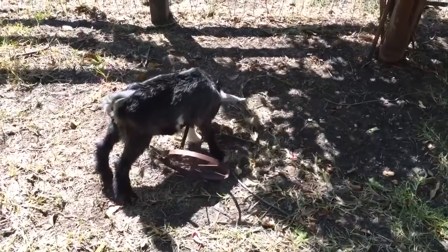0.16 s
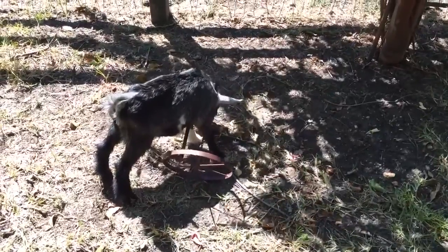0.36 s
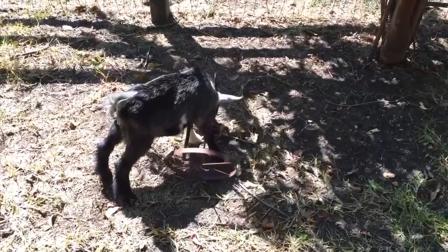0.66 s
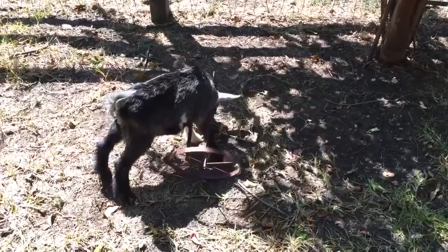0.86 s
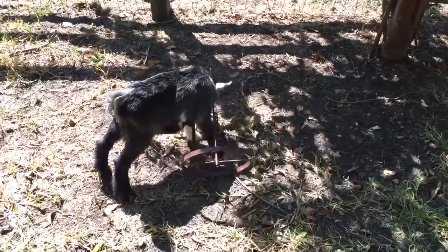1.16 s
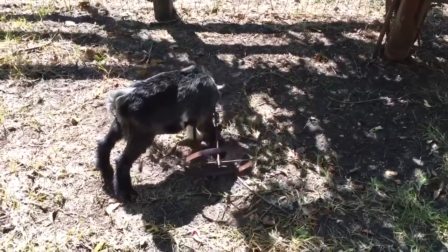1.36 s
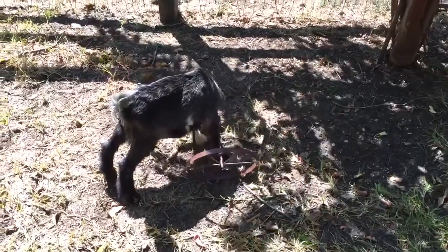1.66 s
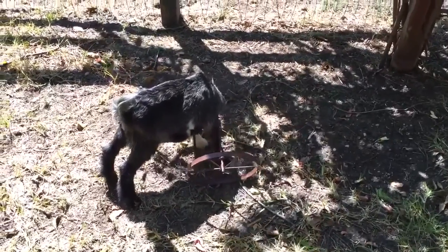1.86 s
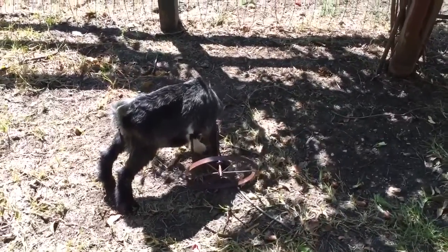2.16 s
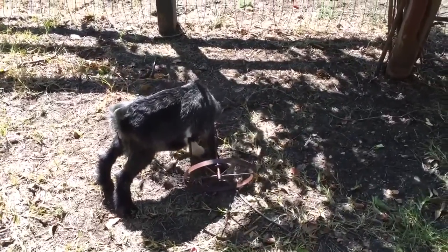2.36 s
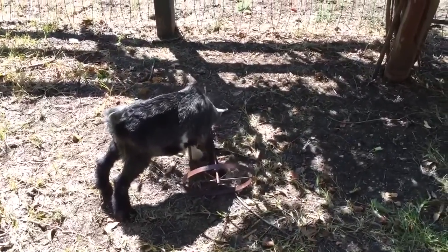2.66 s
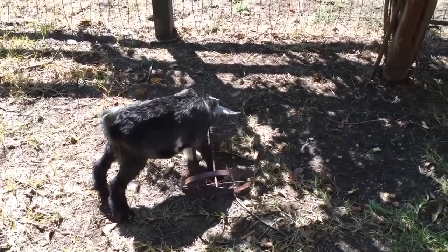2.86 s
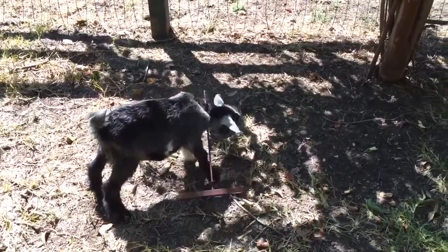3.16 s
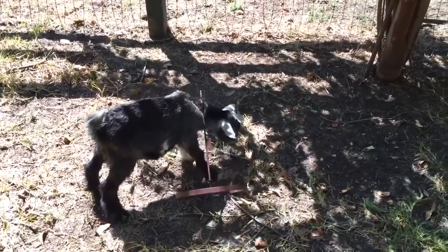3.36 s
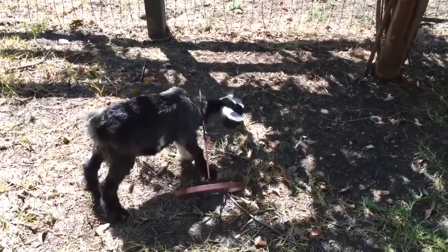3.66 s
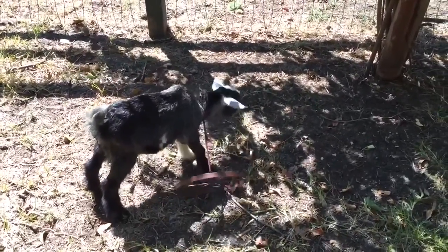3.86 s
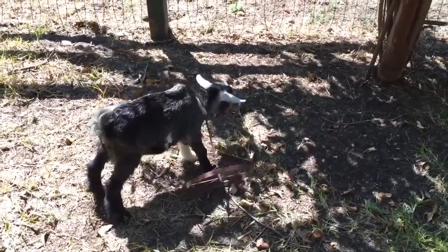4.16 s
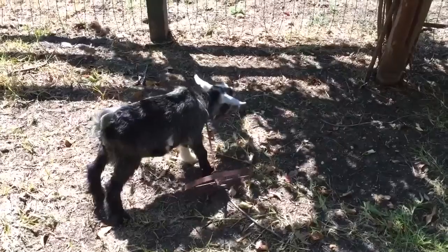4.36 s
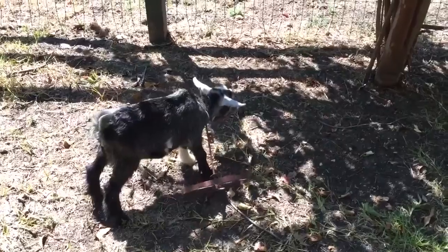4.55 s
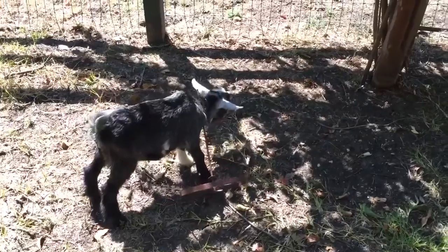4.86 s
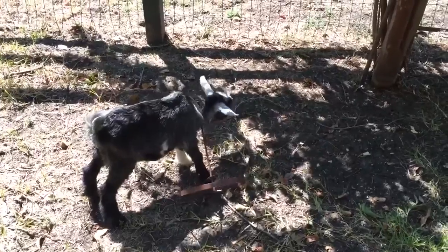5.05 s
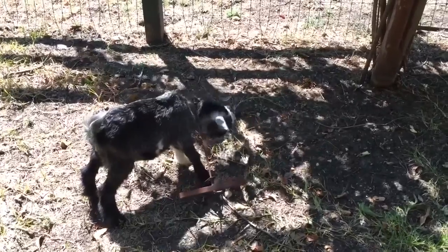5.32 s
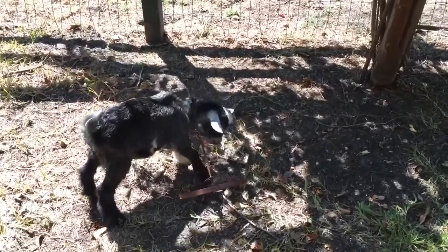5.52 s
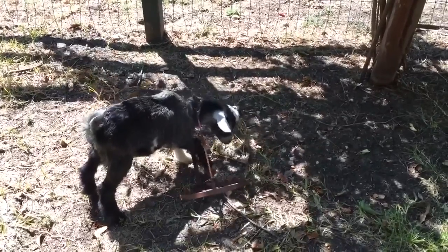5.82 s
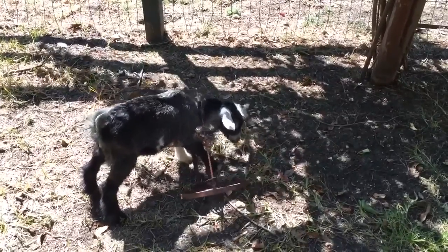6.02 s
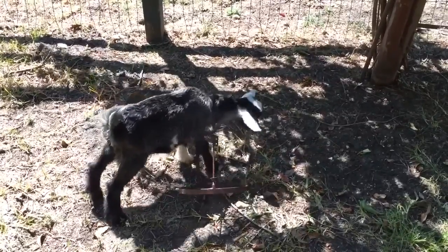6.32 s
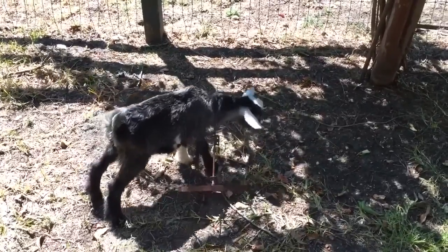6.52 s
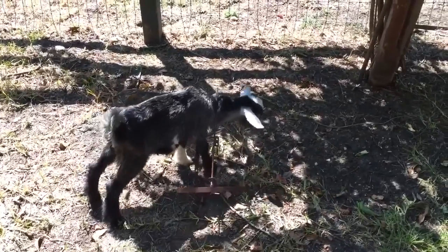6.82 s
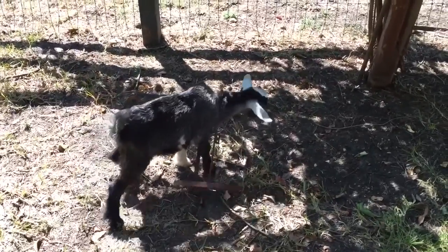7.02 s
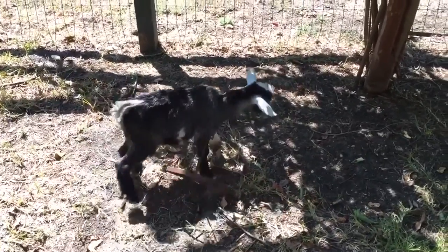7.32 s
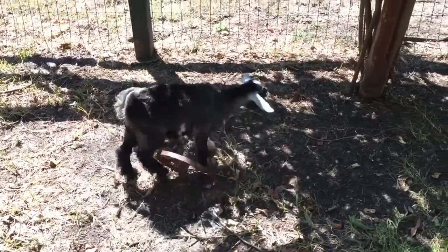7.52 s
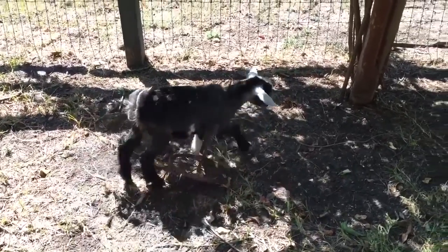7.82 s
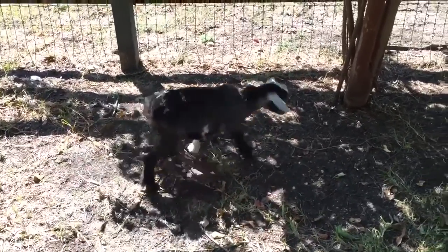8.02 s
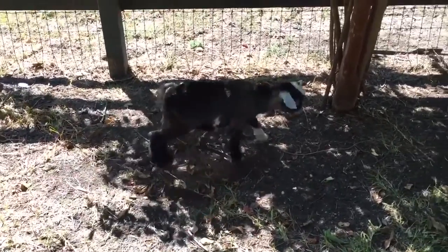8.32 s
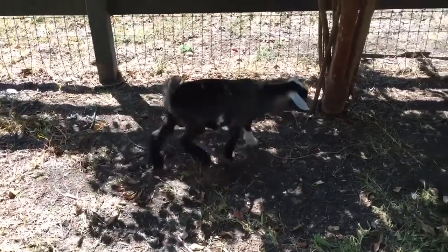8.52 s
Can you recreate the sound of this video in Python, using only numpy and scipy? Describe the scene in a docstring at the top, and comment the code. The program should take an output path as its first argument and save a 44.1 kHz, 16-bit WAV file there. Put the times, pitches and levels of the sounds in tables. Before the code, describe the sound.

Quiet yard with low engine rumble, sharp twig clicks, one hard hollow knock, faint bird warbling, then thin metallic scraping and chinking on dry ground.

```python
"""Puffs of wind buffet the microphone over a distant traffic rumble; soon a fowl calls far off and a small bird warbles.
Nearby, a young goat in a fenced yard shuffles with a small iron wheel caught on its leg.
The wheel scrapes dry ground and rings thinly, hooves and twigs tick, and there is one hard knock.
Shaped noise makes wind, traffic and grit; gliding tones make the animals; short pushes ring the iron and the knocks."""
import sys
import numpy as np
from scipy import signal
from scipy.fft import rfft, irfft
from scipy.io import wavfile
from scipy.ndimage import uniform_filter1d

SR = 44100
rng = np.random.default_rng(int(sys.argv[2]) if len(sys.argv) > 2 else 0)


def ratio(d):
    """dB to gain"""
    e = np.asarray(d, float) / 20
    return 10 ** e


def output_pcm(signal):
    """Save a mono or channel-first signal as 16-bit PCM at the path in sys.argv[1].

    Samples are clipped to [-1, 1] before scaling.
    """
    pcm = np.clip(np.atleast_2d(signal).T, -1, 1) * 32767
    wavfile.write(sys.argv[1], SR, np.round(pcm).astype(np.int16))


N = 382788
TIME = np.arange(N) / SR

# Wheel dragged on the ground: start_s, rise_s, hold_s, level_db, crunch_db (against the hiss), ringing_share (0-1)
WHEEL_DRAGS = [(1.109, 0.022, 0.029, -62.5, -4, 0.3), (1.226, 0.012, 0.041, -65, -4, 0.52),
               (3.912, .01, 0.083, -66, -2, 0.67), (3.996, 0.0065, 0.058, -58, -6, 1),
               (4.136, 0.0025, 0.012, -55, -30, 1), (4.151, 0.009, 0.044, -68, -20, 0.7),
               (6.3, 0.068, 0.0116, -76, -23, 0.3), (6.504, 0.011, 0.084, -73, -23, 0.28),
               (7.002, 0.14, 0.0167, -63.5, -30, 0.87), (7.203, 0.0041, 0.14, -58.5, -13.5, 1),
               (7.358, 0.006, 0.064, -59.5, -9.5, 0.6), (7.664, 0.0057, 0.0032, -49, -6.5, 0.29),
               (7.708, 0.0052, 0.0029, -58.5, -15, 0.93), (7.783, 0.014, 0.0108, -53.5, -3, 0.5),
               (7.812, 0.008, 0.047, -51, -6.5, 0.75), (7.873, 0.042, 0.03, -48, -2.5, 0.28),
               (7.945, 0.011, 0.066, -58, -11, 0.9), (8.054, 0.0077, 0.062, -66.5, -24, 0.45),
               (8.122, 0.021, 0.024, -60.5, 0, 0.2), (8.154, 0.0306, 0.026, -56.5, -2, 0.5),
               (8.22, 0.02, 0.07, -71, -10, 0.3), (8.31, 0.018, 0.059, -49, -7.5, 0.73),
               (8.39, 0.003, 0.046, -52.5, -10, 1)]
# Ringing modes of the iron wheel, lowest rim mode first: pitch_hz, width_hz, level_db (relative)
WHEEL_MODES = [(3800, 29, 5), (4820, 46, 6), (6340, 13, 2), (7365, 26, 3), (7050, 25, -15.5), (8900, 40, 6),
               (9100, 85, -6), (9510, 38, 12), (9700, 63, 6), (10930, 26.4, 8), (11400, 21, -3),
               (11400, 65, -2), (11900, 26, 13), (13100, 50, 11), (14100, 50, -16), (14300, 67, 3.5),
               (15100, 60, -3)]
# Stones chinking on the iron: start_s, level_db, centre_hz (of the modes struck)
STONE_CHINKS = [(4.1395, -48.5, 13000), (6.3669, -65, 8970), (6.515, -65.5, 11300), (7.195, -53, 9700),
                (7.358, -51.5, 13100), (7.358, -55, 11400), (7.8005, -51, 7050), (7.8199, -47.5, 6463),
                (8.0765, -47, 11840), (8.33, -58, 9510), (8.331, -46, 3800), (8.33, -55, 10930),
                (8.3935, -49, 11900), (8.425, -48, 13100)]
# Twigs and grit snapping: start_s, level_db, pitch_hz, tap_db (against the click)
TWIG_SNAPS = [(0.961, -42.5, 10100, -20), (1.043, -50, 9000, -25), (1.0597, -33, 11300, -8),
              (1.118, -38, 11100, -25), (1.1296, -35, 5600, 8), (1.1445, -29, 8660, -35),
              (1.2, -31.5, 11500, -35), (1.2353, -24, 11200, -31), (1.251, -31.5, 7170, -0.5),
              (1.3117, -40, 6180, -25), (1.402, -47, 2010, -30), (1.8066, -38, 11800, -13),
              (3.0798, -23.5, 9050, -14), (3.1552, -39, 11200, -23), (3.2082, -27.5, 11700, -37),
              (3.4631, -17.5, 7740, -29), (3.478, -17, 8400, -13), (3.6025, -31.5, 9600, -6),
              (3.669, -29, 2490, -36), (3.6693, -22.5, 8800, -6), (3.808, -43, 5540, -28),
              (3.9114, -46, 7910, -30), (3.951, -38, 12030, -22.5), (4.0054, -30.5, 6900, -35),
              (4.0258, -31.5, 8300, -27), (4.0502, -29.5, 9310, 5.5), (4.126, -34, 11100, -30),
              (4.14, -25, 10500, -23), (5.4778, -51, 5920, -27), (6.0026, -53, 5400, -20),
              (7.276, -35, 9430, -14), (7.5558, -44, 14470, -30), (7.6739, -17, 11300, -29),
              (7.6786, -20, 8250, -36), (7.713, -24, 12500, -12), (7.801, -43, 5000, -13.5),
              (7.938, -31, 9000, -6.5), (7.942, -30.5, 8000, -9), (8.1432, -35, 7960, -18),
              (8.208, -38, 6000, -25), (8.318, -37, 11000, -20)]
# Hard hollow knocks: start_s, level_db
HARD_KNOCKS = [(3.463, -18), (3.669, -41)]
# Resonances of the small hollow: pitch_hz, width_hz, level_db (relative)
HOLLOW_MODES = [(800, 1500, -22), (1345, 330, 3), (1550, 590, 1.5), (2226, 190, -13.5)]
# Small bird, one row a note or part of a note:
# start_s, length_s, pitch_hz (at the start), glide_hz, level_db, trill_swing_hz
BIRD_SONG = [(2.075, 0.1, 3574, -250, -64.5, 57), (2.243, 0.066, 3340, -43.5, -61.5, 12),
             (2.328, 0.066, 3268, 188.5, -59.5, 29), (2.41, 0.063, 3380, 0.5, -75.5, 18.4),
             (2.807, 0.0179, 3563, -150, -65, 11.6), (2.826, 0.087, 3307, 20, -58.5, 64),
             (2.912, 0.019, 3390, 162.5, -67.5, 8.3), (2.933, .014, 4230, 64, -69.5, 10),
             (2.954, 0.116, 3396, -110, -58, 31), (3.086, 0.044, 3317, -6, -50.5, 13),
             (3.143, 0.084, 3320, 3.5, -76, 12), (3.81, 0.037, 3690, -100, -72, 19),
             (3.85, 0.055, 3275, 112, -63, 72), (3.911, 0.23, 3366, 2.5, -63, 29),
             (4.094, 0.058, 3317, -39.5, -54, 8), (4.147, 0.059, 3270, 0, -63, 4.5),
             (5.26, 0.026, 3800, -61.5, -71, 18), (5.335, 0.054, 3346, 3.5, -69.5, 60.6),
             (5.44, 0.14, 3320, -30, -63, 20), (5.586, 0.055, 3230, -9, -57, 21),
             (5.66, 0.067, 3220, -3.5, -66, 21), (6.083, 0.037, 3930, -150, -70.5, 25),
             (6.124, 0.047, 3920, -60, -67.5, 51), (6.197, 0.11, 3600, -170, -68.5, 54),
             (6.322, 0.09, 3410, -38, -68, 36.3), (6.425, 0.05, 3280, 3, -62, 45),
             (6.49, 0.086, 3308, 0, -77, 24), (8.18, 0.047, 3280, 72, -64, 50),
             (8.24, 0.067, 3280, -110, -60, 46), (8.334, 0.056, 3300, -70.5, -58, 18),
             (8.383, 0.052, 3374, -31, -58, 10), (8.453, 0.046, 3237, 32.5, -54.5, 8),
             (8.498, 0.014, 3286, 91, -58.5, 8), (8.523, 0.0524, 3220, 6, -66.5, 10)]
# Far fowl, one row a stretch of call; the long second note takes two rows:
# start_s, length_s, pitch_hz (second harmonic), glide_hz, level_db, upper_lift_db
FOWL_CALL = [(0.844, 0.0926, 2867, 67, -57, -7), (0.939, 0.059, 2940, -1, -63, -3.5),
             (1.003, 0.1086, 2930, -37, -65.5, 6.5), (1.125, 0.06, 2540, -12, -61.5, 4.5)]
# How hoarse each stretch is: hoarseness (0-1)
FOWL_HOARSENESS = [.15, 1, 1, .25]
# Fixed resonances of the fowl's throat: pitch_hz, level_db
THROAT_CURVE = [(1400, -13.5), (2150, -9), (2550, 5), (2900, 0.5), (3600, -3), (3850, -11), (4350, -9),
                (5100, -17), (5800, -12), (6600, -23)]
# Wind on the microphone: centre_s, level_db, length_s (each layer scales it)
WIND_PUFFS = [(0.051, -46, 0.14), (0.141, -39, 0.052), (0.275, -29, 0.035), (0.564, -54.5, 0.053),
              (0.674, -27.5, 0.048), (1.176, -59, 0.0091), (1.923, -43, 0.07), (4.73, -55, 0.098),
              (6.839, -40, 0.018)]
# Far engines: time_s, lower_drone_db, upper_drone_db
ENGINE_LEVELS = [(0, -65, -64), (0.9, -60, -72), (1.14, -49, -50), (1.9, -44, -57.5), (2.15, -52, -56),
                 (2.55, -57, -47.5), (3.5, -57.5, -61), (5.15, -54.5, -63), (5.9, -49, -50),
                 (7.25, -57.5, -64.5), (8.68, -50.5, -60)]
# Weaker drones: pitch_hz, level_db
WEAK_HUMS = [(150, -72.5), (195, -79), (241, -74)]
# Tone colour of the distant traffic and air: pitch_hz, level_db (relative, per Hz)
YARD_SPECTRUM = [(82, -20), (140, -4), (212, -20.5), (286, -15.5), (349, -17.5), (508, -16.5), (539, -14.5),
                 (684, -13), (900, -13), (1400, -20.5), (2910, -29), (3480, -25.5), (4770, -30),
                 (5820, -29), (16000, -45.5)]

# Envelopes: level at the start of the rise (dB), sag while held (dB per s), fall afterwards (dB per s)
DRAG_SHAPE = (-15, 35, 520)
BIRD_SHAPE, BIRD_RISE_S = (-4, 11, 1100), 0.0111
FOWL_SHAPE, FOWL_RISE_S = (-3, 4.2, 390), 0.013

# Scrape: how unevenly grit arrives, how far each narrow band flares alone, slope of the crunch
GRIT_SWING_DB, PATCH_DB, CRUNCH_TILT_DB_PER_KHZ = 2, 3, 0.5
# How far each resonance comes and goes, and its pitch wander (fraction), as the contact point moves
MODE_SWING_DB, MODE_DRIFT = 4.5, 0.004
# Low mode of the rim, heard with the crunch; its level is against the crunch
RIM_HZ, RIM_WIDTH_HZ, RIM_DB = 3800, 70, -13
# Stone contact time, and how far in octaves one stone reaches among the modes
CHINK_PUSH_SAMPLES, CHINK_OCTAVES = 60, 0.067
# Rise of a snap in cycles of its own pitch, and pitch of the duller tap under every snap
CLICK_CYCLES, TAP_HZ = 0.55, 3300
# Bird: level dip and fast level flutter, both for 100 Hz of trill swing; echo level per sample of scatter
TRILL_DIP_DB, BIRD_RASP_DB, BIRD_ECHO_DB = 1, 7, -35
# Fowl: strength of half-way lines when fully hoarse, flicker of each partial, share kept clear of fast flutter
HALF_LINES, PARTIAL_SWING_DB, RASP_KEEPS = 0.55, 3, 0.4
# The bass of each puff lingers this many lengths, this much weaker
PUFF_SKIRT, SKIRT_DB = 2.67, -12


def scrape():
    """Rubbing over grit and leaf litter gives a patchy crackle, a duller crunch, and iron modes that come and go."""
    sizes = ratio(1.2 * rng.exponential(size=(2, N))) * rng.standard_normal((2, N))
    hits = rng.random((2, N)) < np.array([[9000.0], [6000.0]]) / SR  # average hits per second
    fine, coarse = sizes * hits * ratio(GRIT_SWING_DB * np.array([walk(90), walk(60)]))

    crackle = patches(fine, 4930.0, 860.0, 0, 12)
    rise_db = np.interp(np.arange(N // 2 + 1) * SR / N, [5000, 9000], [-8, 0])
    crackle = unit(irfft(rfft(crackle) * ratio(rise_db), N))

    crunch = unit(patches(coarse, 1270.0, 503.0, CRUNCH_TILT_DB_PER_KHZ, 8))
    crunch += ratio(RIM_DB + MODE_SWING_DB * walk(25)) * loose_ring(coarse, RIM_HZ, RIM_WIDTH_HZ)

    # many weaker modes at random pitches fill in the ringing
    minor = [(hz, 90.0, 2) for hz in rng.uniform(6500, 15800, 16)]
    iron = np.zeros(N)
    for hz, width_hz, db in WHEEL_MODES[1:] + minor:
        iron += ratio(db + MODE_SWING_DB * walk(22)) * loose_ring(fine, hz, width_hz)
    iron = unit(iron)

    out = np.zeros(N)
    for start, rise, hold, db, crunch_db, share in WHEEL_DRAGS:
        share = np.clip(share, 0, 1)
        now = near(start, rise + hold)
        mix = np.sqrt(1 - share) * crackle[now] + np.sqrt(share) * iron[now]
        mix += ratio(crunch_db) * crunch[now]
        out[now] += ratio(db) * envelope(TIME[now] - start, rise, hold, DRAG_SHAPE) * mix
    return out


def patches(grit, low_hz, step_hz, tilt_db, count):
    """Grit split into overlapping narrow bands that flare separately; the tilt is in dB per kHz."""
    out = np.zeros(N)
    for hz in low_hz + step_hz * np.arange(count):
        out += ratio(tilt_db * hz / 1000 + PATCH_DB * walk(70)) * band(grit, hz, hz + 1.2 * step_hz)
    return out


def chinks():
    """Each small stone rings the wheel modes whose pitch lies near the centre of its strike."""
    start, db, centre = np.transpose(STONE_CHINKS)
    n = np.arange(CHINK_PUSH_SAMPLES)
    out = np.zeros(N)
    for hz, width_hz, _ in WHEEL_MODES:
        reach = np.exp(-(np.log2(hz / centre) / CHINK_OCTAVES) ** 2)
        # a soft push at the mode's own pitch
        push = np.hanning(len(n)) * np.cos(2 * np.pi * hz * n / SR) * 4 / len(n)
        strikes = np.convolve(blows(start, ratio(db) * reach), push)[:N]
        out += ring(strikes, hz, width_hz)
    return out


def ticks():
    """A snap is a very short click at its own pitch and a lower tap, then debris and a smeared fence return."""
    out, t = np.zeros(N), np.arange(SR // 16) / SR
    after = ratio(-27.5) * np.exp(-t / 0.00088)  # debris at once
    after += ratio(-65.0) * np.exp(-((t - 0.013) / 0.0053) ** 2)  # return about 13 ms later
    after += ratio(-50.5) * np.exp(-t / 0.023)  # longer tail
    tap = t / 0.0003 * np.exp(1 - t / 0.00015) * np.sin(2 * np.pi * TAP_HZ * t)
    for start, db, hz, tap_db in TWIG_SNAPS:
        age = t * hz / CLICK_CYCLES  # 1 when the click is strongest
        click = age * np.exp(1 - age) / 2 * np.sin(2 * np.pi * hz * t)
        snap = click + ratio(tap_db) * tap
        debris = ratio(15.0) * after * rng.standard_normal(len(t))
        i = int(start * SR)
        out[i:i + len(t)] += ratio(db) * (snap + signal.fftconvolve(snap, debris)[:len(t)])
    return band(out, 1500.0, 20000.0)


def knocks():
    """A short push and rebound ring a small damped hollow; ground and fence return it."""
    start, db = np.transpose(HARD_KNOCKS)
    # the push comes 0.6 ms after the table time, the stronger rebound 0.06 ms later
    push = blows(start + 0.0006, ratio(db - 3.5)) - blows(start + 0.00066, ratio(db))
    push = uniform_filter1d(push, size=8)
    body = sum(ratio(db + 12.0) * ring(push, hz, width_hz) for hz, width_hz, db in HOLLOW_MODES)
    body = band(body, 570.0, 7450.0)
    t = np.arange(SR // 8) / SR
    returns = rng.standard_normal(len(t)) * ratio(-35.5) * np.exp(-t / 0.011) * (t > 0.004)
    return body + signal.fftconvolve(body, returns)[:N]


def bird():
    """A near sine glides through each part of the song, with some trills; leaves and fences smear it."""
    turn = 2 * np.pi * np.cumsum(44.0 + 6 * walk(17)) / SR  # trill near 44 Hz
    trill, throb = np.sin(turn) + 0.405 * walk(90), np.cos(turn)
    flutter, rasp = ratio(1.6 * walk(60)), walk(350)
    pitch, gain = np.zeros(N), np.zeros(N)
    for start, length, start_hz, change_hz, db, swing_hz in BIRD_SONG:
        now = near(start, length)
        t = TIME[now] - start
        pitch[now] = glide(t, length, start_hz, change_hz) + swing_hz * trill[now]
        wobble_db = swing_hz / 100 * (TRILL_DIP_DB * (throb[now] - 1.0) + BIRD_RASP_DB * rasp[now])
        gain[now] = ratio(db + wobble_db) * envelope(t, BIRD_RISE_S, length - BIRD_RISE_S, BIRD_SHAPE)
    song = np.sqrt(2) * gain * np.sin(2 * np.pi * np.cumsum(pitch) / SR)
    t = np.arange(SR // 3) / SR
    scatter = rng.standard_normal(len(t)) * np.exp(-np.log(1000) * t / 0.22)  # falls 60 dB in 0.22 s
    return song * flutter + ratio(BIRD_ECHO_DB) * signal.fftconvolve(song, scatter)[:N]


def fowl():
    """Harmonics pass through throat resonances; hoarseness blurs and chops them and adds half-way lines."""
    throat_hz, throat_db = np.transpose(THROAT_CURVE)
    chop = np.sin(2 * np.pi * np.cumsum(29.0 + 8 * walk(20)) / SR)
    jitter = walk(300)
    # partials are counted in halves of the voice pitch, so odd ones lie half-way between harmonics
    flicker = {k: PARTIAL_SWING_DB * walk(25.0) for k in range(2, 10)}
    # the third harmonic (k = 6) stays clear
    rasp = {k: RASP_KEEPS + walk(400) if k != 6 else np.ones(N) for k in flicker}
    call = np.zeros(N)
    for (start, length, hz, change_hz, db, lift_db), hoarse in zip(FOWL_CALL, FOWL_HOARSENESS):
        now = near(start, length)
        t = TIME[now] - start
        half = glide(t, length, hz, change_hz) / 4 * (1 + 0.0074 * hoarse * jitter[now])
        phase = 2 * np.pi * np.cumsum(half) / SR
        stack = np.zeros(len(t))
        for k in flicker:
            partial_db = np.interp(k * half, throat_hz, throat_db) + flicker[k][now] + lift_db * (k > 4)
            roughness = 1 + hoarse * (rasp[k][now] - 1)
            strength = HALF_LINES * np.sqrt(hoarse) if k % 2 else 1
            stack += ratio(partial_db) * roughness * strength * np.sin(k * phase)
        gain = np.sqrt(2) * ratio(db + 1.4 * hoarse * chop[now])
        call[now] += gain * envelope(t, FOWL_RISE_S, length - FOWL_RISE_S, FOWL_SHAPE) * stack
    return call


def wind():
    """Short pushes of low turbulent pressure; the higher part lives only in the core of each puff."""
    low = unit(band(rng.standard_normal(N), 38.6, 133.0, order=3))
    high = ratio(-14.0) * unit(band(rng.standard_normal(N), 190.0, 400.0, order=4))
    return low * (puffs(0.66) + ratio(SKIRT_DB) * puffs(PUFF_SKIRT)) + high * puffs(0.438)


def puffs(stretch):
    """Smooth swell and fall of every puff, with its length multiplied by stretch."""
    return sum(ratio(db) * np.exp(-(2 * (TIME - centre) / length / stretch) ** 2)
               for centre, db, length in WIND_PUFFS)


def rumble():
    """Far engines: two narrow drones and weaker hums, all wavering, over broad low noise."""
    out = ratio(-60.5 + 3.8 * walk(2.58)) * unit(band(rng.standard_normal(N), 42.0, 145.0))
    for column, hz in ((1, 73.4), (2, 97.1)):
        drone = unit(ring(rng.standard_normal(N), hz, 7.8))
        out += ratio(curve(ENGINE_LEVELS, column, -60.0)) * drone
    for hz, db in WEAK_HUMS:
        out += ratio(db + 2.1 * walk(2.4)) * unit(ring(rng.standard_normal(N), hz, 4.6))
    return out


def far_band():
    """Noise through two equal resonators makes a faint thin line that flickers under everything."""
    hz, width_hz = 3870.0, 120
    line = ring(ring(rng.standard_normal(N), hz, width_hz), hz, width_hz)
    return ratio(-83.5 + 3.8 * walk(25)) * unit(line)


def yard():
    """Steady far noise; below 2 kHz each sixth of an octave swells alone, the treble stays smooth."""
    hz, db = np.transpose(YARD_SPECTRUM)
    f = np.maximum(np.arange(N // 2 + 1) * SR / N, 1)
    spectrum = rfft(rng.standard_normal(N)) * ratio(np.interp(np.log(f), np.log(hz), db))
    sixth = np.minimum(6 * np.log2(f / 125), 24)  # steps above 125 Hz; 24 is 2 kHz and up
    out = np.zeros(N)
    for k in range(-6, 25):
        part = irfft(spectrum * np.clip(1 - abs(sixth - k), 0, 1), N)
        swell_db = np.interp(k, [10, 18, 24], (3, 2.6, 0))  # at about 400 Hz, 1 kHz and 2 kHz
        out += part * ratio(swell_db * walk(6))
    return ratio(-62.5) * unit(out)


def envelope(t, rise, hold, shape):
    """Gain t seconds into an event: a rise, a sagging hold, then a steady fall in dB."""
    first_db, sag, fall = shape
    db = first_db * np.clip(1 - t / rise, 0, 1)
    db = db - sag * np.clip(t - rise, 0, hold) - fall * np.maximum(t - rise - hold, 0)
    return ratio(db) * np.clip(t / 0.001, 0, 1)  # 1 ms fade-in


def glide(t, length, hz, change_hz):
    """Pitch that slides evenly over the given length."""
    return hz + change_hz * np.clip(t / length, 0, 1)


def near(start, length):
    """The samples of one event and 0.3 s of tail."""
    return slice(int(start * SR), int((start + length + 0.3) * SR))


def ring(x, hz, width_hz):
    """One mode: a decaying sine for each push; a wider mode dies faster."""
    r, w = np.exp(-np.pi * width_hz / SR), 2 * np.pi * hz / SR
    return signal.lfilter([0, np.sin(w)], [1, -2 * r * np.cos(w), r * r], x)


def loose_ring(x, hz, width_hz):
    """One mode whose pitch wanders a little, scaled to rms 1."""
    turn = np.exp(2j * np.pi * np.cumsum(hz * (1 + MODE_DRIFT * walk(12))) / SR)
    # shift the mode down to 0 Hz, let it decay there, then shift it back
    slow = signal.lfilter([1], [1, -np.exp(-np.pi * width_hz / SR)], x / turn)
    return unit((slow * turn).imag)


def blows(times, gains):
    """One-sample pushes."""
    x = np.zeros(N)
    np.add.at(x, (np.asarray(times) * SR).astype(int), gains)
    return x


def band(x, lo_hz, hi_hz, order=2):
    """Band-pass filter."""
    edges = [lo_hz, min(hi_hz, 0.45 * SR)]
    return signal.sosfilt(signal.butter(order, edges, "bandpass", fs=SR, output="sos"), x)


def walk(rate):
    """Random levels held 1 / rate s and smoothed twice; rms 1."""
    k = max(int(SR / rate), 2)
    held = np.repeat(rng.standard_normal(N // k + 1), k)
    return unit(uniform_filter1d(uniform_filter1d(held, k), k)[:N])


def unit(x):
    """Scaled to rms 1."""
    return x / np.sqrt(np.mean(x ** 2))


def curve(rows, column, outside):
    """One column of a table at every sample, with a fixed value outside its times."""
    rows = np.array(rows, float)
    return np.interp(TIME, rows[:, 0], rows[:, column], outside, outside)


def scene():
    """All sources as heard at one microphone."""
    nearby = scrape() + chinks() + ticks() + knocks()
    animals = bird() + fowl()
    background = wind() + rumble() + far_band() + yard()
    return (nearby + animals + background)[None]


def top_cut(x):
    """Nothing passes above the cut-off."""
    return signal.sosfilt(signal.butter(12, 16660, fs=SR, output="sos"), x)


def record(dry):
    """The microphone rolls off the deepest bass; a steep low-pass leaves nothing above about 16 kHz."""
    x = signal.sosfilt(signal.butter(2, 48.0, "highpass", fs=SR, output="sos"), dry)
    x = signal.sosfilt(signal.ellip(8, 0.2, 60, 16000, fs=SR, output="sos"), x)
    return top_cut(x)


dry = scene()
out = record(dry)
output_pcm(out)
```